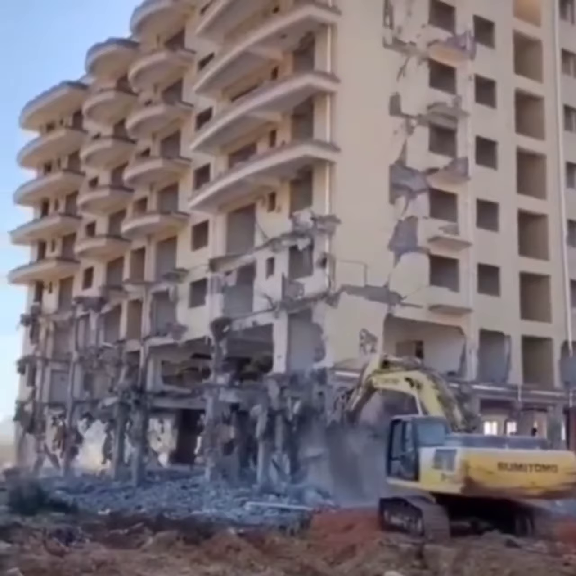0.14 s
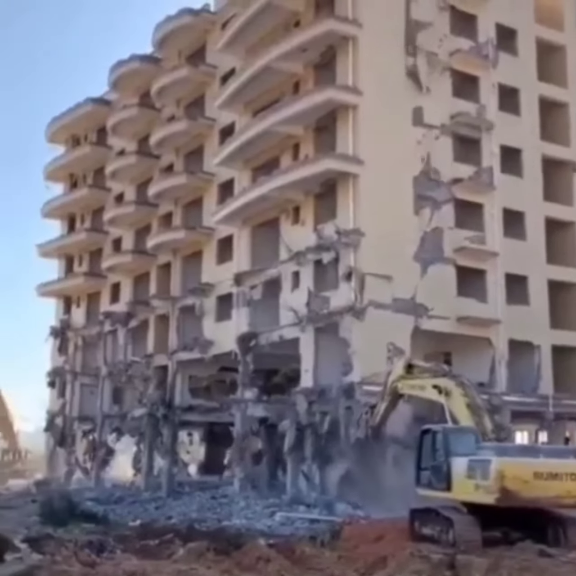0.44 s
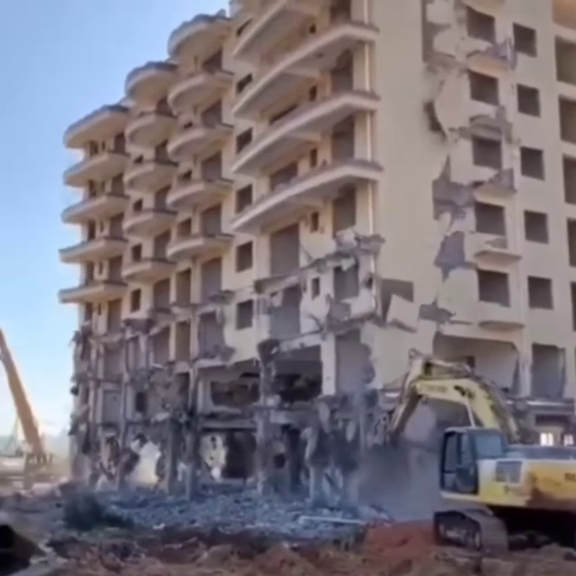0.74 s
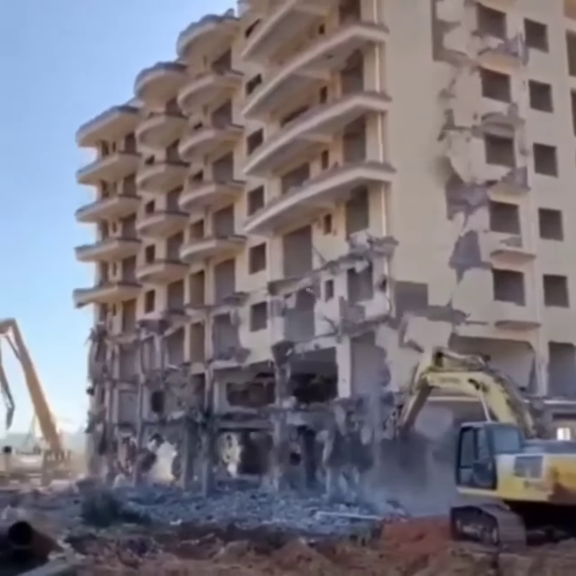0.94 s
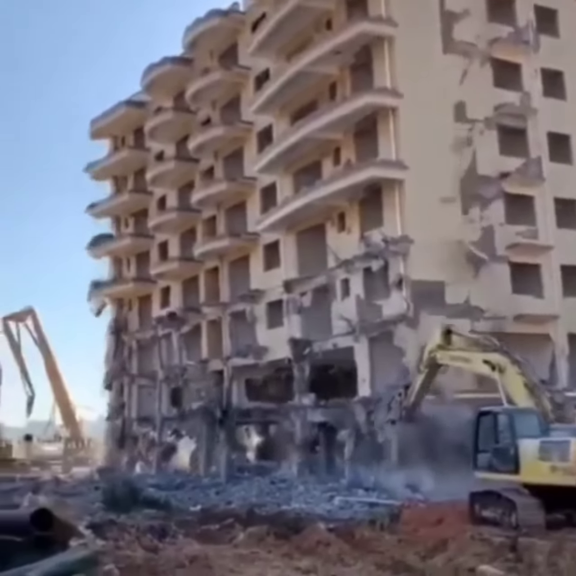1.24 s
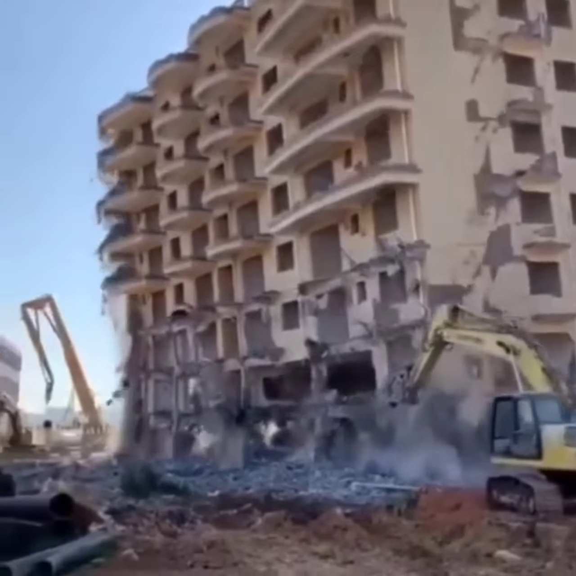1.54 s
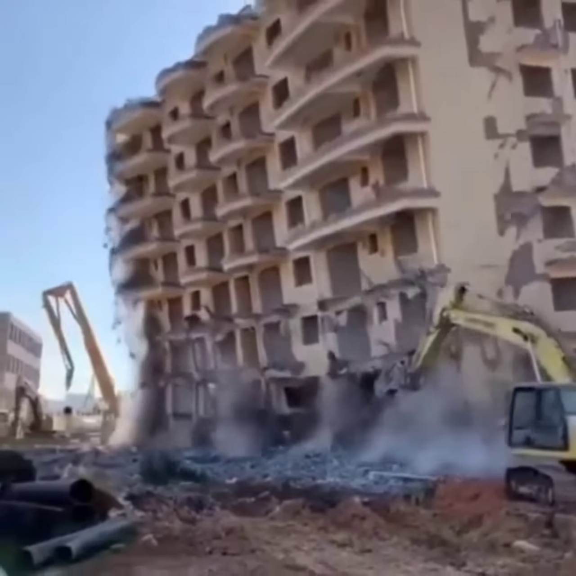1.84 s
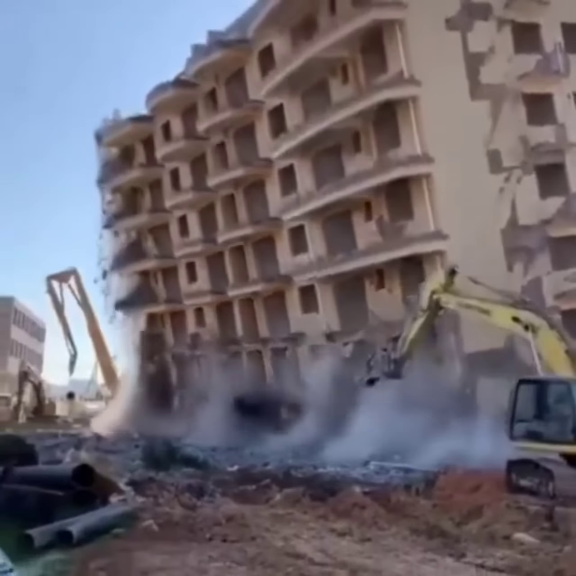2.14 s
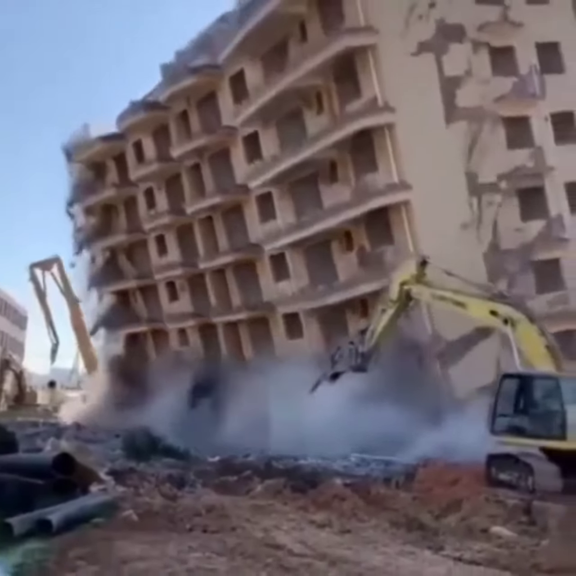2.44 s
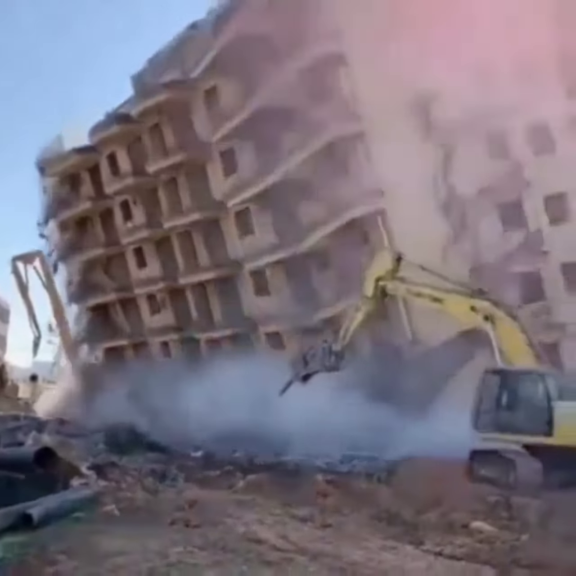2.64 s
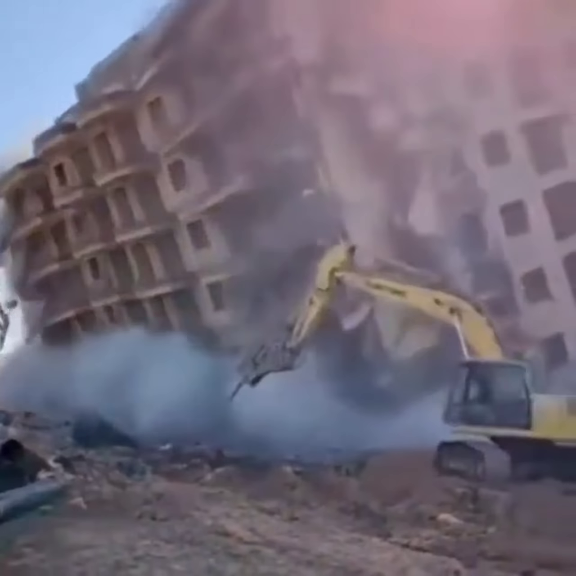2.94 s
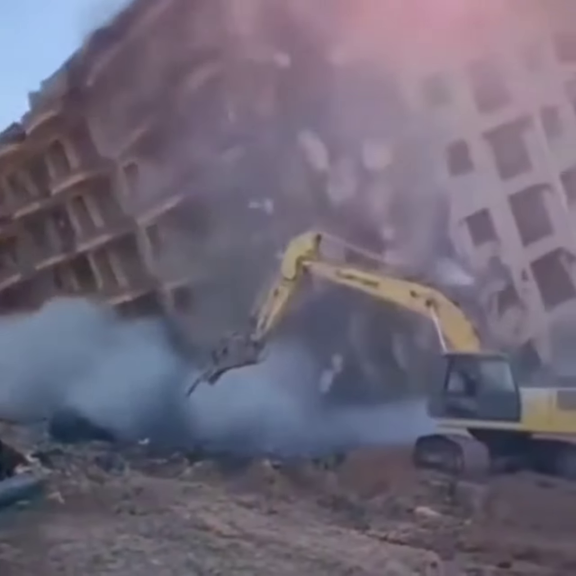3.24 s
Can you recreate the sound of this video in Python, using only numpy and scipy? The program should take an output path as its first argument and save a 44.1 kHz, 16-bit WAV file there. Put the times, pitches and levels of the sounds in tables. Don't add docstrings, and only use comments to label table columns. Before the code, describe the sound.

A large concrete building collapses outdoors: rubble pours in a steady roar, slabs crack, floors thud and the ground rumbles, building after the first second, heard through a dull, compressed phone microphone with short echo from nearby walls.

```python
import sys
import numpy as np
from scipy import signal
from scipy.fft import rfft, irfft, next_fast_len
from scipy.io import wavfile
from scipy.ndimage import uniform_filter1d, map_coordinates

SR = 44100
rng = np.random.default_rng(int(sys.argv[2]) if len(sys.argv) > 2 else 0)


def generate_wav(sig):
    pcm = np.round(np.clip(np.atleast_2d(sig).T, -1, 1) * 32767).astype(np.int16)
    wavfile.write(sys.argv[1], SR, pcm)


def field_ratio(decibels):
    return 10 ** (np.asarray(decibels, dtype=float) / 20)


N = 149940
TIME = np.arange(N) / SR


def unit(x):
    return x / np.sqrt(np.mean(x ** 2) + 1e-20)


def along(points, hz):
    f, v = np.transpose(points)
    return np.interp(np.log(hz + 1), np.log(f + 1), v)


def curve(rows):
    return np.interp(TIME, *np.transpose(rows))


def wobble(rate):
    return map_coordinates(rng.standard_normal(400), [np.arange(N) * min(rate, 100) / SR])


def bump(middle_s, half_s):
    return np.exp(-0.5 * ((TIME - middle_s) / half_s) ** 2)


def filtered(x, response):
    m = next_fast_len(N + SR // 2)
    return irfft(rfft(x, m) * response(np.fft.rfftfreq(m, 1 / SR)), m)[..., :N]


def rush(spectrum, patchy_db, size=1024):
    z = signal.stft(rng.standard_normal(N + size), nperseg=size)[2]
    field = uniform_filter1d(rng.standard_normal(z.shape), size=3, axis=0)
    field = uniform_filter1d(field, size=2, axis=1)
    x = signal.istft(z * field_ratio(patchy_db * unit(field)), nperseg=size)[1][:N]
    return unit(filtered(x, lambda hz: field_ratio(along(spectrum, hz))))


def ring(t, hz, t60, rise):
    return np.sin(2 * np.pi * hz * t) * field_ratio(-60 * t / t60) * (1 - np.exp(-t / rise))


def strikes(table, gain_db, ring_s, rise_s, cycles=0):
    out, t = np.zeros(N + SR), np.arange(SR // 3) / SR
    for s, db, hz in table:
        out[round(s * SR):][:len(t)] += field_ratio(db + gain_db) * ring(t, hz, cycles / hz + ring_s, rise_s)
    return out[:N]


# (frequency [Hz], 60 dB decay time [s])
SITE_DECAY = [(100, .5), (1000, 0.48), (7000, 0.12)]


def site(x):
    hz, t, z = signal.stft(rng.standard_normal(SR // 2), SR, nperseg=256)
    fading = z * field_ratio(-60 * t / along(SITE_DECAY, hz)[:, None])
    tail = signal.istft(fading, SR, nperseg=256)[1]
    return x + field_ratio(-2.5) * signal.fftconvolve(x, tail / np.linalg.norm(tail))[:N]


# (time [s], level [dB])
GROUND_LEVEL = [(0.0, -38), (0.07, -34), (0.29, -32.5), (0.63, -33), (1.12, -27), (1.49, -27.5),
                (1.79, -28.5), (1.92, -26), (2.11, -23.5), (2.61, -29), (2.82, -26), (3.29, -31),
                (3.4, -31.5)]
# (frequency [Hz], level [dB per Hz])
RUMBLE_SPECTRUM = [(12, -40.5), (20, -8), (54, -3), (110, -7.5), (140, -30), (240, -120)]


def ground_rumble():
    level_db = curve(GROUND_LEVEL) - 1 + 0.3 * wobble(16)
    return field_ratio(level_db) * rush(RUMBLE_SPECTRUM, patchy_db=-1, size=4096)


# (time [s], peak [dB], pitch [Hz])
THUDS = [(0.09, -34, 252), (0.13, -37.5, 180), (0.174, -30.5, 183), (0.197, -30, 81), (0.232, -26, 65),
         (0.275, -27, 65), (0.307, -30, 66.4), (0.458, -33.5, 221), (0.516, -23, 204),
         (0.548, -31.5, 133.5), (0.679, -21.5, 55.5), (0.708, -28, 188), (0.798, -27, 227),
         (0.888, -24, 47.6), (0.905, -26.5, 181), (0.972, -26.5, 164), (1.047, -27.5, 93.5),
         (1.204, -28.5, 243), (1.213, -22, 65), (1.285, -25, 192), (1.326, -22, 149), (1.529, -28, 233),
         (1.532, -26, 70.6), (1.689, -27.5, 234), (1.811, -21, 101.4), (2.037, -27.5, 200),
         (2.147, -24, 187.6), (2.176, -19.5, 54.7), (2.226, -22.5, 156), (2.261, -18.5, 59.1),
         (2.284, -26, 162), (2.368, -20.5, 48), (2.499, -27, 217), (2.583, -23.5, 64.5),
         (2.719, -27, 153.6), (2.78, -24.5, 94.8), (2.856, -23.5, 99), (2.92, -23.5, 185.5),
         (3.047, -19.5, 199), (3.076, -23, 187), (3.117, -23, 82.5), (3.126, -27, 241.3), (3.25, -21, 67.7),
         (3.277, -28.5, 184), (3.34, -25, 70)]


def floor_thuds():
    return strikes(THUDS, gain_db=11.5, ring_s=0.086, rise_s=0.011, cycles=3.2)


# (frequency [Hz], level [dB per Hz])
BOOM_SPECTRUM = [(59, -37), (100, -3), (183, -1), (221, -5), (252, -7), (366, -11), (520, -11.5),
                 (680, -42), (1140, -120)]
# (time [s], half length [s], swell [dB])
LANDINGS = [
    (1.31, 0.014, 4.5),
    (2.279, 0.093, -1),
    (2.755, 0.08, 3),
    (3.074, .05, 3),
]


def hollow_boom(pour_db):
    swell_db = sum(db * bump(s, half_s) for s, half_s, db in LANDINGS)
    growth_db = 1.7 * TIME
    level_db = pour_db + swell_db - 7.5 + growth_db + 0.32 * wobble(8)
    return field_ratio(level_db) * rush(BOOM_SPECTRUM, patchy_db=2.5, size=2048)


# (time [s], peak [dB], ring pitch [Hz])
BLOCKS = [(0, -36.5, 378), (0.153, -30, 542), (0.162, -25.5, 745), (0.18, -35, 726), (0.226, -30, 513),
          (0.551, -34, 429), (0.603, -32.5, 386), (0.801, -24.5, 493), (0.943, -32.5, 620),
          (0.966, -28.5, 858), (1.155, -26.5, 297.5), (1.248, -27.5, 371), (1.422, -30, 565),
          (1.436, -27.5, 772), (1.581, -26, 892), (1.642, -26, 464), (1.692, -26.5, 652), (1.7, -29.5, 758),
          (1.793, -26, 745), (1.846, -32.5, 504), (2.037, -28, 696), (2.049, -29.5, 317), (2.057, -31, 900),
          (2.171, -30, 417), (2.264, -28.5, 513), (2.295, -28, 812), (2.362, -31.5, 720), (2.507, -26, 311),
          (2.548, -29.5, 582), (2.606, -31.5, 761), (2.728, -25.5, 485), (2.812, -30, 743),
          (2.832, -27, 697), (2.902, -27, 651), (2.966, -29.5, 862), (3.001, -28.5, 533),
          (3.021, -25.5, 434), (3.03, -25, 258), (3.05, -29.5, 741), (3.117, -27.5, 625),
          (3.123, -26, 265.3), (3.169, -30, 504), (3.187, -26, 756), (3.268, -28, 342), (3.335, -33, 471)]
# (time [s], peak [dB], ring pitch [Hz])
STONES = [(0.142, -35, 1566), (0.153, -34.5, 1637), (0.171, -32, 1210), (0.229, -32, 1478),
          (0.246, -31.5, 1110), (0.386, -29.5, 1130), (0.481, -34, 1475), (0.499, -31, 1670),
          (0.528, -33, 1157), (0.618, -33.5, 1238), (0.734, -32.5, 1193), (0.795, -24, 1514),
          (0.92, -29.5, 1383), (1.149, -27, 1033), (1.161, -30, 1525), (1.181, -31.5, 1817),
          (1.428, -26, 1464), (1.532, -30, 1567), (1.581, -33, 920), (1.587, -27.5, 1670),
          (1.727, -27, 1087), (2.057, -30, 917), (2.087, -26, 1050), (2.101, -31, 1723),
          (2.374, -25.5, 1653), (2.383, -27, 960), (2.69, -30.5, 994), (2.911, -27.5, 1333),
          (2.966, -29.5, 895), (3.271, -27.5, 1545)]
# (time [s], peak [dB], ring pitch [Hz])
CHIPS = [(0.159, -38, 3025), (0.159, -38.5, 1906), (0.177, -41, 3338), (0.18, -38.5, 2175),
         (0.211, -34, 2186), (0.229, -40, 4016), (0.354, -44, 4000), (0.383, -34.5, 2568),
         (0.452, -32.5, 3106), (0.473, -49.5, 3128), (0.479, -46, 3316), (0.548, -35, 2767),
         (0.836, -33, 2837), (0.859, -38, 3198), (1.001, -34, 2670), (1.047, -38, 3623), (1.593, -26, 2245),
         (1.796, -38, 3876), (2.078, -41, 3149), (2.087, -33.5, 3225), (2.153, -24.5, 2239),
         (2.162, -43, 4037), (2.31, -29, 2471), (2.458, -30, 2772), (2.478, -41.5, 4183), (2.74, -41, 2977),
         (2.818, -39, 3833), (2.917, -42.5, 4156), (2.966, -44, 3930), (2.975, -45, 4107)]


def debris():
    blocks = strikes(BLOCKS, gain_db=9.5, ring_s=0.09, rise_s=0.009)
    stones = strikes(STONES, gain_db=9, ring_s=0.1, rise_s=0.008)
    chips = strikes(CHIPS, gain_db=9.5, ring_s=0.09, rise_s=0.008)
    return blocks + stones + chips


# (frequency [Hz], level [dB per Hz])
GRIT_SPECTRUM = [(2710, -20.5), (3800, -3.5), (4600, -8.5), (4960, -8.5), (5560, -1), (6840, 1.5),
                 (7270, 1.5), (7600, 0), (9880, -41.5), (16700, -120)]
# (frequency [Hz], level [dB per Hz])
ROAR_SPECTRUM = [(150, -13), (250, -6), (374, -7.5), (749, -1), (932, -7), (1590, -3.5), (1980, -7),
                 (2300, -7), (2750, -10), (2950, -13.5), (4600, -25), (5980, -58.5), (10100, -120)]
GRIT_DB = -17.5
# (time [s], peak [dB], ring pitch [Hz])
SLABS = [(0.1875, -14.5, 2137), (0.3327, -14, 1860), (0.489, -20, 1673), (0.7243, -12.5, 923),
         (0.8065, -12.5, 1523), (0.8647, -11, 1683), (0.9566, -14, 1140), (1.064, -16, 1163),
         (1.1295, -18.5, 1003), (1.439, -15, 1505), (1.5254, -9, 1574), (1.6489, -11, 1844),
         (1.7208, -13.5, 1188), (1.924, -36, 1254), (1.997, -11.5, 1685), (2.1297, -12.5, 1490),
         (2.179, -13, 1340), (2.2278, -26.5, 1700), (2.3184, -15, 1614), (2.5474, -17, 1596),
         (2.696, -13, 1028), (2.8663, -23.5, 1495), (2.9652, -10, 1735), (3.0196, -14, 1650),
         (3.091, -12.5, 1513), (3.1437, -15.5, 1487), (3.198, -16.5, 1490), (3.2843, -21.5, 1550)]


def slabs():
    rings = strikes(SLABS, gain_db=-8, ring_s=0.04, rise_s=0.0047)
    gate, t = np.zeros(N + SR), np.arange(SR // 4) / SR
    for s, db, _ in SLABS:
        gate[round(s * SR):][:len(t)] += field_ratio(db - 60 * t / 0.083) * (1 - np.exp(-t / 0.006))
    coarse = rush(ROAR_SPECTRUM, patchy_db=4)
    fine = field_ratio(GRIT_DB + 3.5) * rush(GRIT_SPECTRUM, patchy_db=5.5)
    spray = field_ratio(-9.5) * gate[:N] * (coarse + fine)
    return rings + site(0.3 * rings + spray)


def grit(pour_db, spray_db):
    mean_db = pour_db.mean()
    level_db = GRIT_DB + mean_db + 1.1 * (pour_db - mean_db) + spray_db
    shatter_db = 3.5 * bump(1.72, 0.3)
    return field_ratio(level_db + shatter_db) * rush(GRIT_SPECTRUM, patchy_db=4, size=512)


def knocks(count=7000, size=600):
    when, pitch, big = rng.random(count), rng.standard_normal(count), rng.exponential(size=count)
    hz = np.clip(1527 * np.exp(0.8 * pitch), 250, 7500)
    level = field_ratio(big + along(ROAR_SPECTRUM, hz)) * hz ** 0.88
    hz = hz[:, None]
    rings = ring(np.arange(size) / SR, hz, 12 / hz, 0.00033)
    rings = rings * level[:, None]
    at = (when * N).astype(int)[:, None] + np.arange(size)
    return unit(np.bincount(at.ravel(), rings.ravel())[:N])


# (time [s], level [dB])
POUR_LEVEL = [(0.0, -29), (0.06, -32.5), (0.18, -29), (0.31, -28.5), (0.33, -28.5), (0.76, -28.5),
              (0.79, -31.5), (0.8, -27.5), (1.01, -26.5), (1.4, -25), (1.41, -24.5), (1.98, -25),
              (2.14, -25), (2.47, -27), (3.09, -25.5), (3.4, -28)]


def rubble():
    pour_db = curve(POUR_LEVEL)
    surge_db = 1.2 * wobble(9) + 0.8 * wobble(22)
    roar = rush(ROAR_SPECTRUM, patchy_db=3, size=512)
    body = unit(roar + field_ratio(-4.5) * unit(site(knocks())))
    spray_db = surge_db + 1.1 * wobble(14)
    return hollow_boom(pour_db) + field_ratio(pour_db + surge_db) * body + grit(pour_db, spray_db)


def scene():
    return (rubble() + ground_rumble() + floor_thuds() + slabs() + debris())[None]


# (frequency [Hz], step relative to the roar [dB])
ROUNDING_STEP = [(300, -14), (1500, -5.5), (2600, -4.5), (3200, -5.5), (4200, -9.5), (4750, -13),
                 (5000, -13), (5500, -14), (6200, -13), (7500, -14)]


def coarse_rounding(x, size=1408, count=504):
    n, k = np.arange(2 * size)[:, None], np.arange(count)
    window = np.sin(np.pi * (n + 0.5) / (2 * size))
    cosines = np.cos(np.pi / size * (n + 0.5 + size / 2) * (k + 0.5))
    basis = window * cosines * np.sqrt(2 / size)
    at = np.arange(N // size + 2)[:, None] * size + n[:, 0]
    terms = np.pad(x, (size, 2 * size))[at] @ basis
    roar = np.sqrt(np.mean(terms[:, 28:192] ** 2, axis=1, keepdims=True))
    roar = uniform_filter1d(roar, size=3, axis=0)
    scatter = rng.standard_normal((len(at), count // 8))
    scatter = unit(uniform_filter1d(scatter, size=6, axis=0))
    scatter_db = 1.1 * np.repeat(scatter, 8, axis=1)
    step = roar * field_ratio(along(ROUNDING_STEP, k * SR / (2 * size)) + scatter_db)
    whole = np.floor((np.abs(terms) / step) ** 0.75 + 0.4)
    terms = np.sign(terms) * step * whole ** (4 / 3)
    return np.bincount(at.ravel(), (terms @ basis.T).ravel())[size:size + N]


def band_limit(hz):
    return (hz > 8) * field_ratio(-18 * np.clip((hz - 7565) / 48, 0, 6))


def top_cut(x):
    return signal.sosfilt(signal.butter(12, 8680, fs=SR, output="sos"), x)


def record(dry):
    ceiling = 0.36
    held = dry[0] / (1 + np.abs(dry[0] / ceiling) ** 4) ** 0.25
    mix = filtered(coarse_rounding(held)[None], band_limit)
    return top_cut(mix)


dry = scene()
out = record(dry)
generate_wav(out)
```